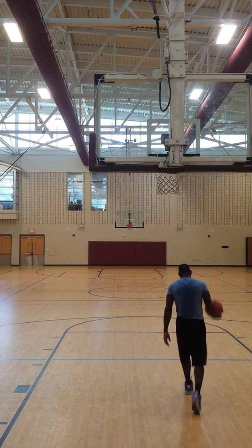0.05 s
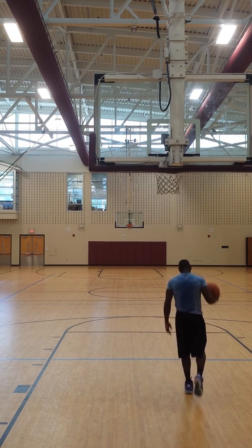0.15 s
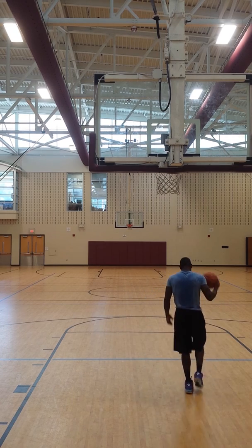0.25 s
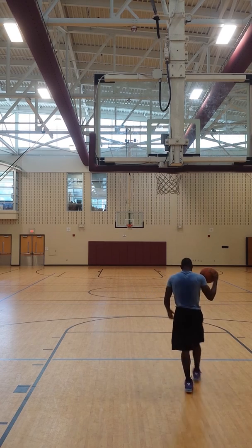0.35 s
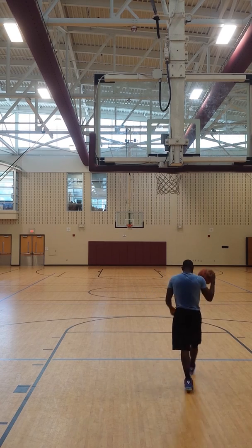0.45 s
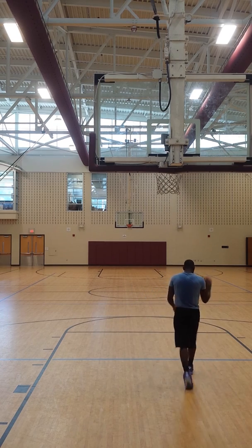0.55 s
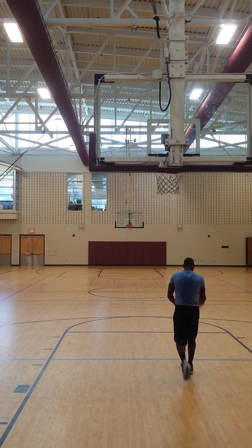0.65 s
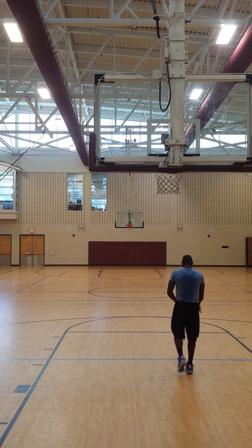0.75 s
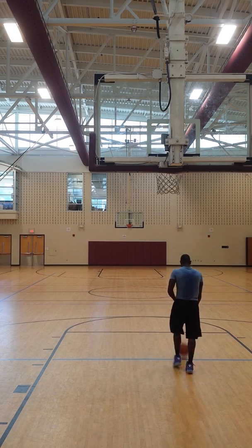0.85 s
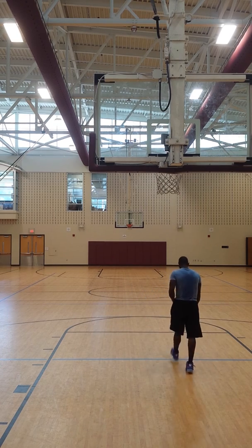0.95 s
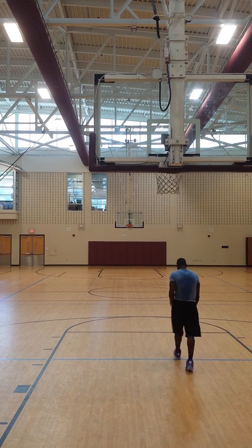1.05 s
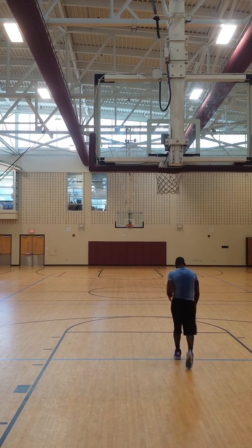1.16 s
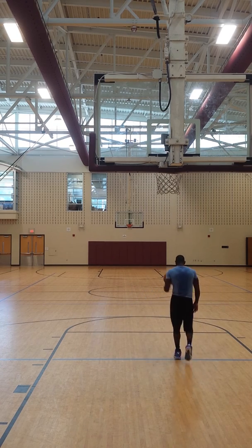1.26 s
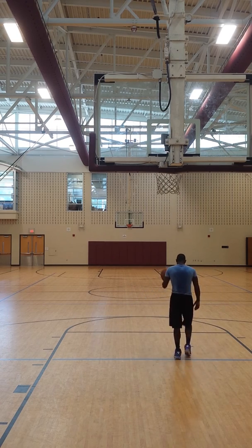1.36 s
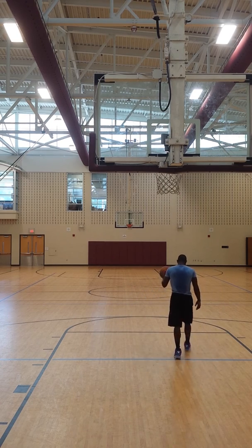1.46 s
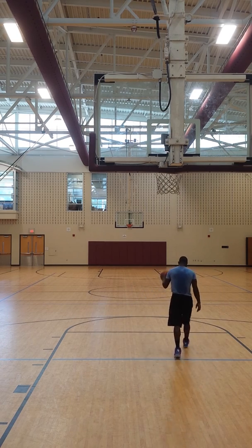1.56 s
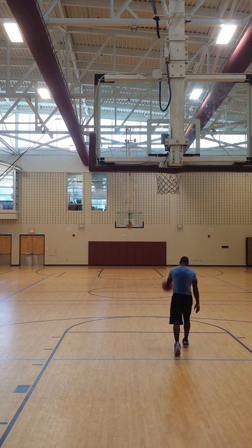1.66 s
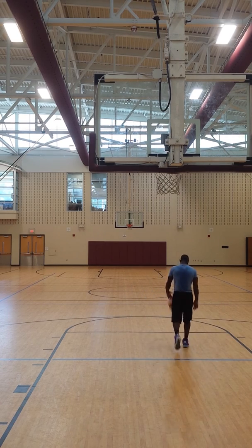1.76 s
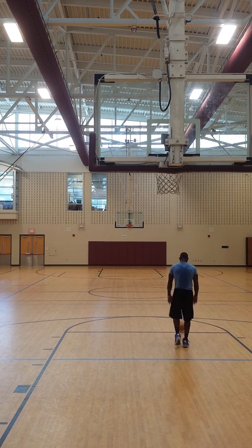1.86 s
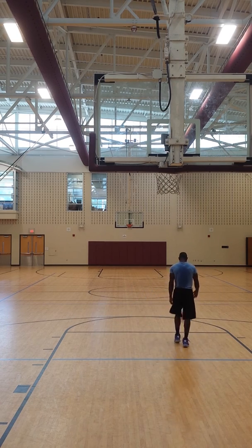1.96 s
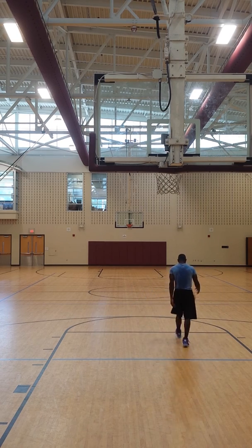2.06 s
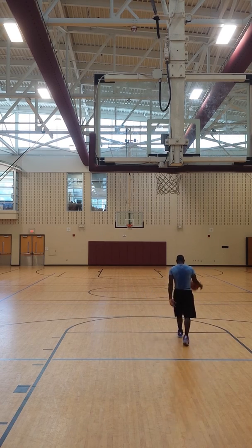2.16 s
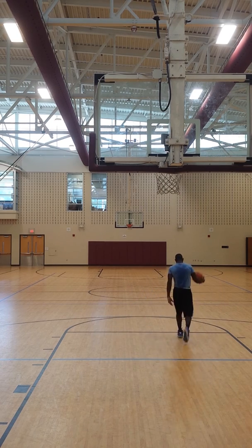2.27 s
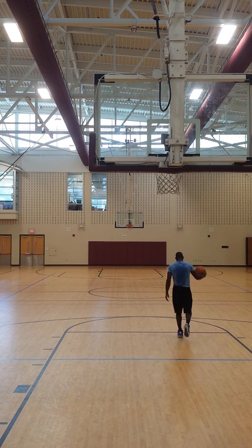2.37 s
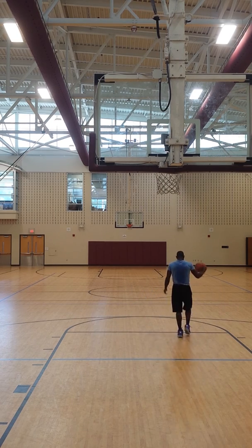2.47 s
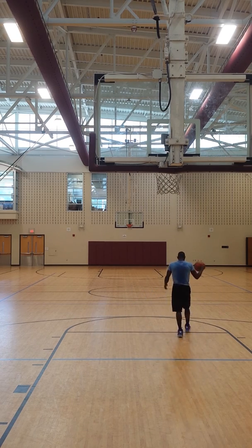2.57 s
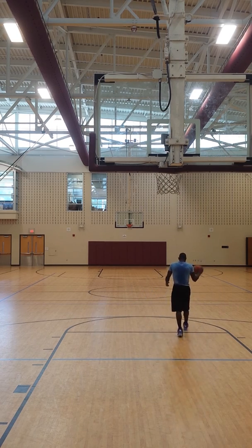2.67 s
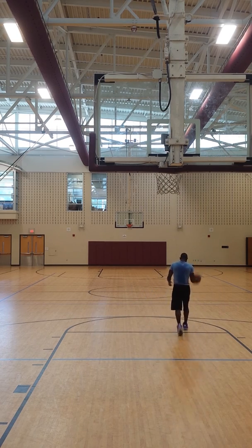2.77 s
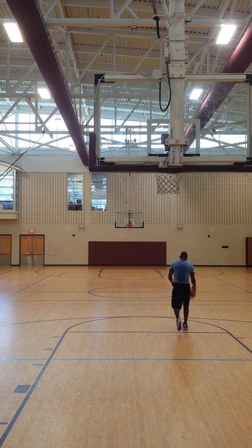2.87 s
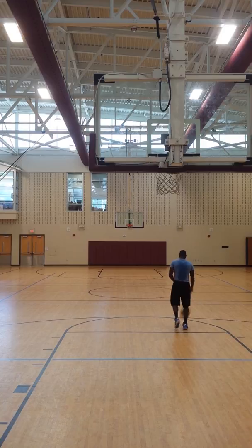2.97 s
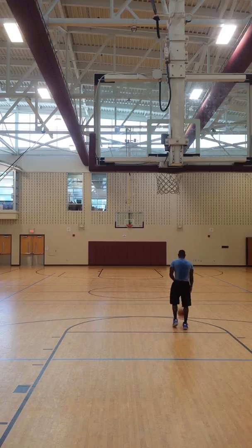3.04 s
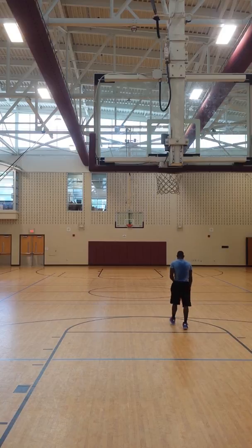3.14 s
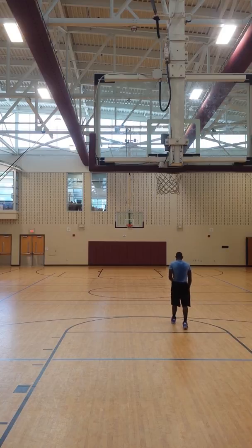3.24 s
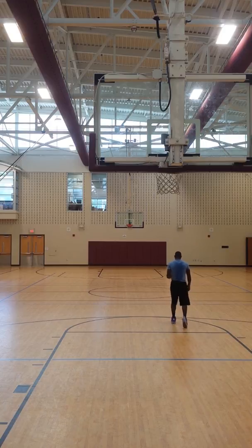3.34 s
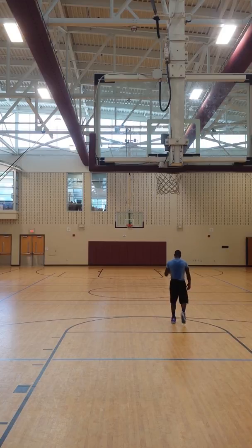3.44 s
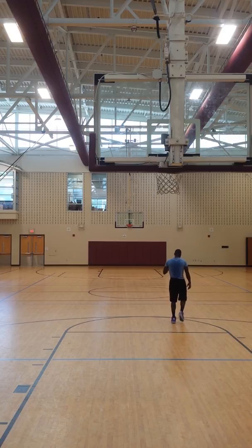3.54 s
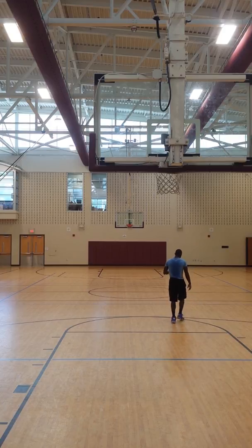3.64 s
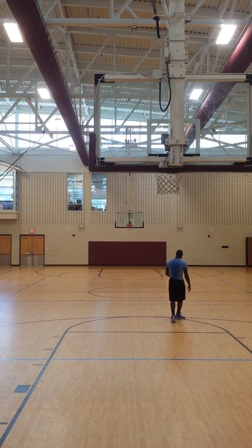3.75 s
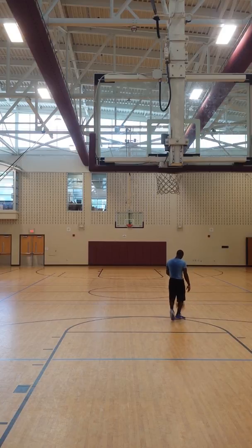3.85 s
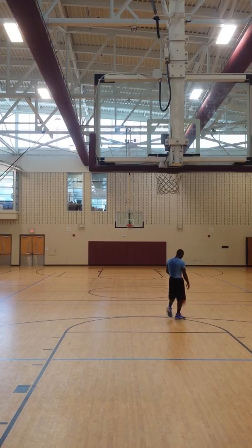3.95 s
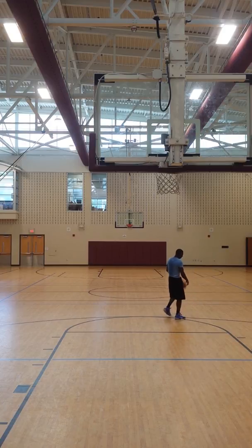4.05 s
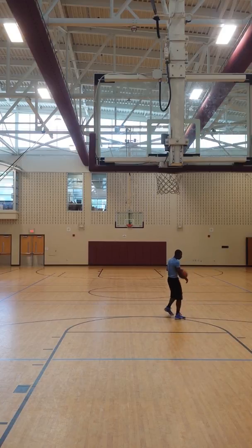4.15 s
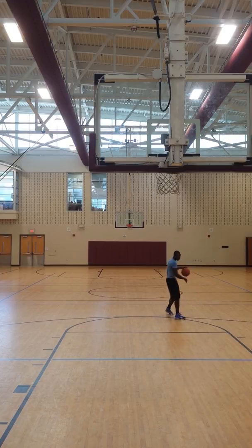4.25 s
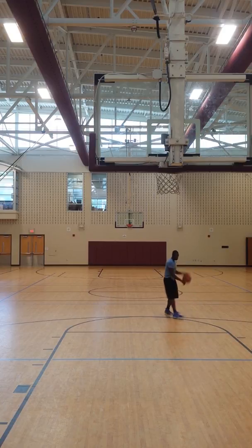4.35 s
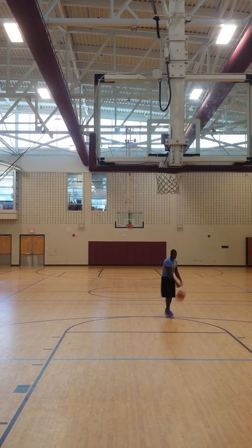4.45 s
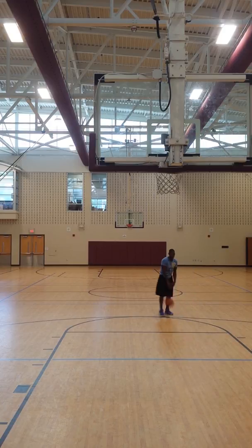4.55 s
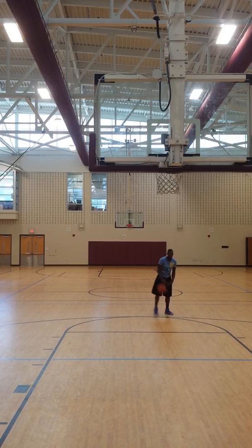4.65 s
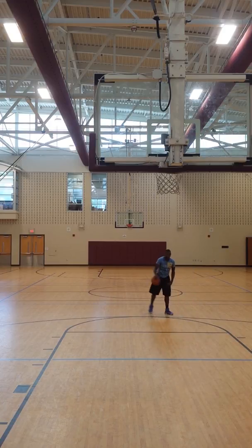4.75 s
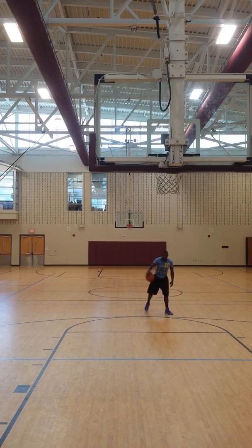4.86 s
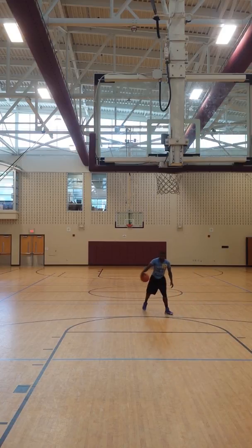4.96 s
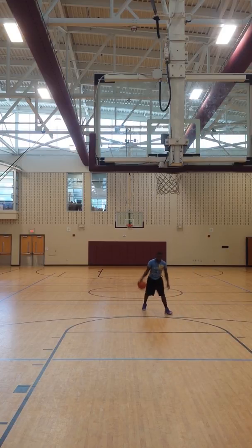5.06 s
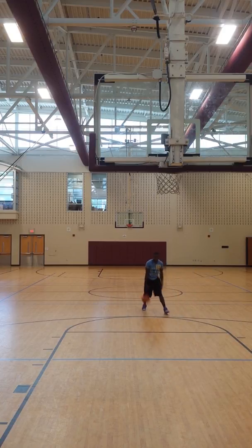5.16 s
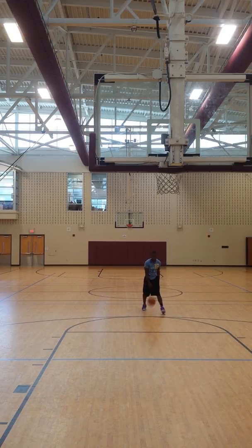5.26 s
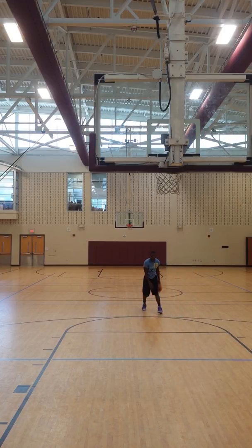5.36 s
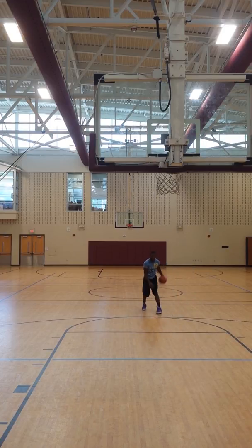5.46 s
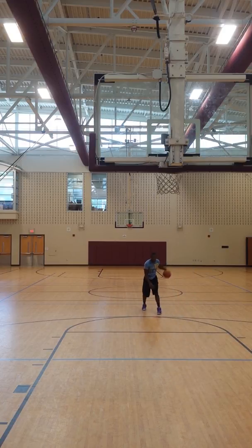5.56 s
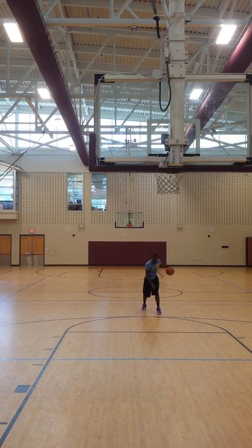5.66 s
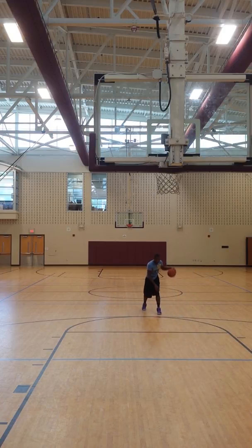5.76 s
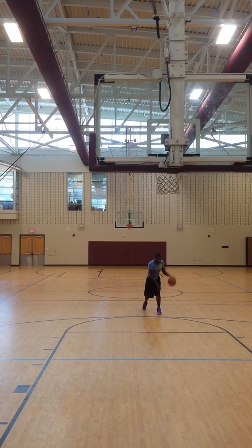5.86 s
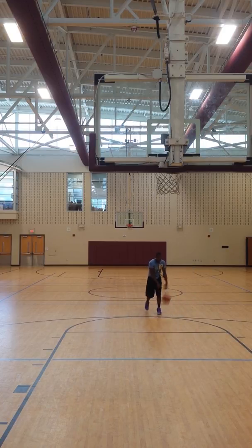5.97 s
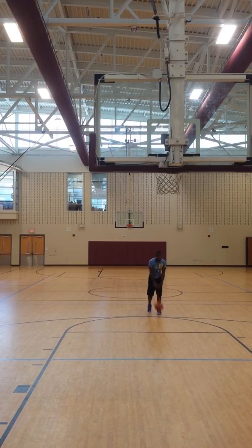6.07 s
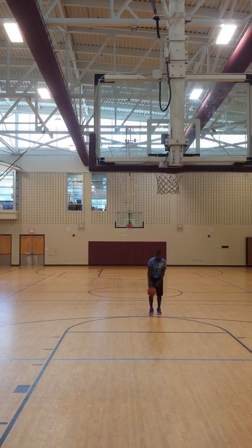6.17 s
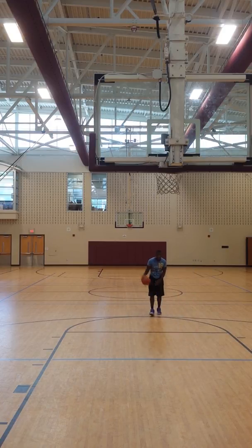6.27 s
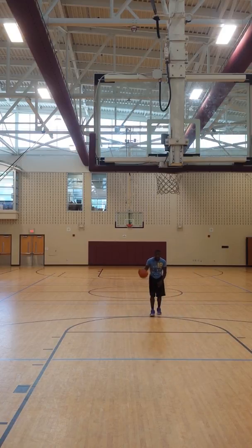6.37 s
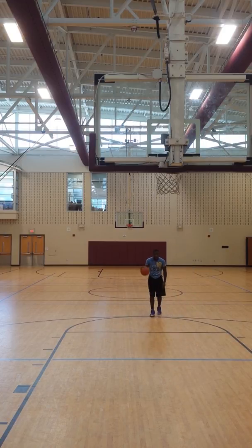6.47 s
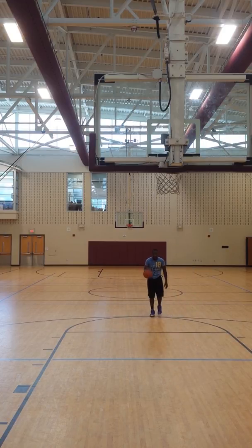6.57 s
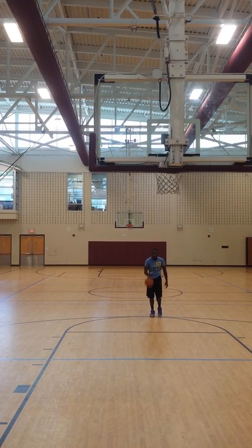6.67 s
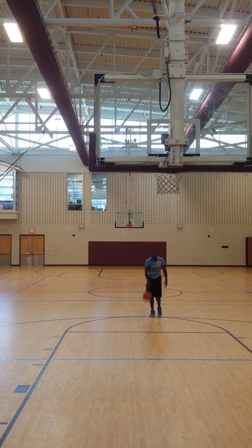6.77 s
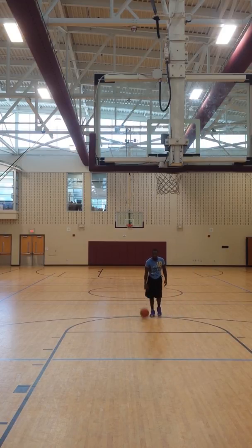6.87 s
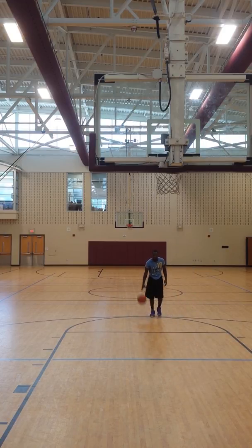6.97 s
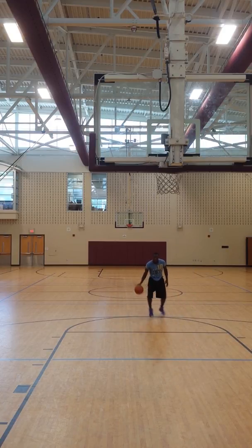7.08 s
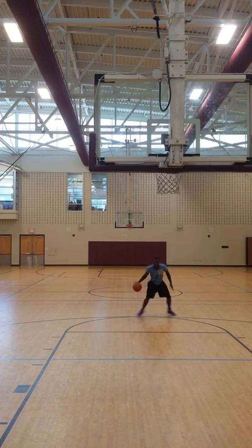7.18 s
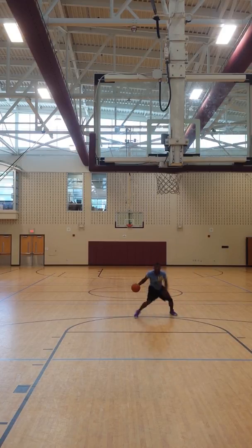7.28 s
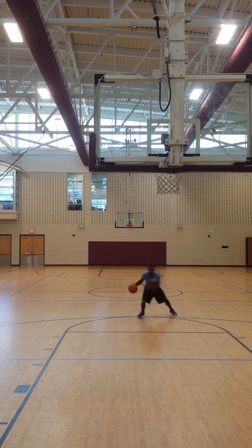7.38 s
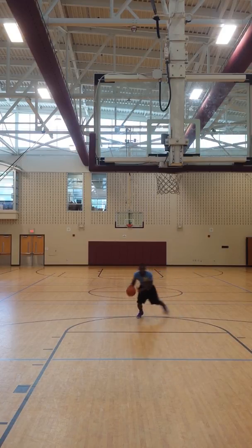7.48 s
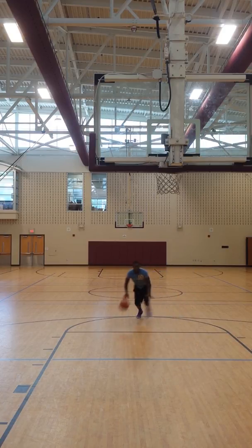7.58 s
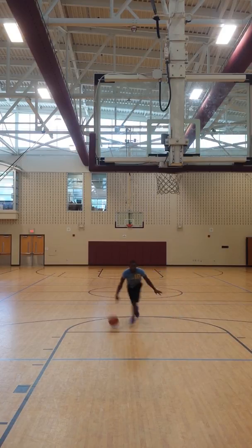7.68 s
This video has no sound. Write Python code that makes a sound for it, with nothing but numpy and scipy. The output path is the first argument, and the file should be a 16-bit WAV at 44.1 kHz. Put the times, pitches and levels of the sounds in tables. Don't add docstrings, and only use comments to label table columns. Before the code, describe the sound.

Eight basketball bounces on a wooden floor, heard from several metres away by a phone in a vast reverberant gym. The tail of an earlier bounce already hangs in the air at the start. One early hit is duller; after the player turns to face the microphone the slaps become crisper. Separate echoes smear into overlapping wash over low air-handling noise, with tiny ticks and a brief high sole squeak before the last bounce.

```python
import sys
import numpy as np
from scipy import signal
from scipy.fft import rfft, irfft, next_fast_len
from scipy.io import wavfile
from scipy.ndimage import uniform_filter1d

SR = 44100
rng = np.random.default_rng(int(sys.argv[2]) if len(sys.argv) > 2 else 0)


def gain_from_decibels(decibels):
    exponent = np.asarray(decibels, float) / 20
    return 10 ** exponent


def dump(signal):
    limited = np.clip(np.atleast_2d(signal).T, -1, 1)
    pcm = np.round(limited * 32767).astype(np.int16)
    wavfile.write(sys.argv[1], SR, pcm)


N = 340194


def unit(x):
    return x / np.sqrt(np.mean(x ** 2) + 1e-20)


def along(points, hz):
    f, v = np.transpose(points)
    return np.interp(np.log(hz + 1), np.log(f + 1), v)


def filtered(x, response):
    m = next_fast_len(x.shape[-1] + 2048)
    return irfft(rfft(x, m) * response(np.fft.rfftfreq(m, 1 / SR)), m)[..., :x.shape[-1]]


def add(track, sound, start_s):
    k = round(start_s * SR)
    first = max(k, 0)
    part = sound[..., max(-k, 0):][..., :N - first]
    track[..., first:first + part.shape[-1]] += part


def ringing(modes, t, scatter_db):
    out = 0
    for hz, db, t60_s in modes:
        level_db = db + scatter_db * rng.standard_normal()
        out = out + gain_from_decibels(level_db - 60 * t / t60_s) * np.sin(2 * np.pi * hz * t)
    return out


def ports(x, lead_ms):
    # freq_hz, left_over_right_db
    direct_pan = [(60, -6.5), (110, 2), (200, 2), (380, 3), (700, 1.5), (1290, 7), (2380, 10.5),
                  (4400, -13.5), (8120, -12.5), (15000, 2)]
    side = np.array([[.5], [-.5]])
    delay_s = 16 / SR - side * lead_ms / 1000

    def response(hz):
        return gain_from_decibels(side * along(direct_pan, hz)) * np.exp(-2j * np.pi * hz * delay_s)
    return filtered(x, response)


def impact(thump_hz, spike_us):
    # freq_hz, level_db, t60_s
    air_modes = [(1060, -11, .014), (1310, -4, .016), (1620, 1, .013), (2120, -2, .009), (2950, -7, .009),
                 (3750, -11, .009)]
    # freq_hz, level_db, t60_s
    floor_modes = [(230, 3, .05), (270, 1, .045), (350, -4, .035), (480, -4, .05), (515, -2.5, .06)]
    t = np.arange(SR // 12) / SR
    u = t / (.75 * spike_us / 1e6)
    spike = -1.1 * u * np.exp(1 - u)
    rattle = .17 * gain_from_decibels(-60 * t / .008) * rng.standard_normal(len(t))
    ring = -.42 * ringing(air_modes, t, scatter_db=2.5)
    push = 1.7 * np.sin(2 * np.pi * thump_hz * (t - .0011)) * gain_from_decibels(-60 * t / .06)
    push = push * (1 - np.exp(-t / .003))
    boards = .8 * (1 - np.exp(-t / .0035)) * ringing(floor_modes, t, scatter_db=1.5)
    return spike, rattle, ring, push, boards


def echoes(k, bounces_s, slap_db, turned):
    places = [(5.5, .6), (7.2, .6), (7.14, .7), (8.76, 1.1), (10.67, 1.55), (11.89, 1.8), (11.5, 1.4),
              (10.92, .4), (10.8, .7), (9.72, .5)]
    images = [(0, 21.63, 0), (0, 21.63, 1), (0, 43.26, 0), (0, 43.26, 2), (44, 43.26, 0), (44, 48, 0),
              (0, 66.4, 0)]
    # slap_db, change_once_turned_db, favoured_hz, thump_db
    returns = [(-2.5, -4.5, 3300, -4), (-3.5, -7, 2800, -7), (-8, -3, 3500, -15), (-10, -6, 3600, -15),
               (-7, -9, 1700, -15), (-13, -4, 2400, -17), (-13, -2, 2600, -17)]
    # start_s, slap_db, favoured_hz
    glints = [(.9463, -21, 2800), (1.9789, -24, 1800), (5.3321, -27, 1800), (.9592, -24, 2600),
              (.997, -26, 6000), (1.1796, -23, 2700), (2.3041, -27, 2000), (4.1796, -24, 2800),
              (4.619, -29, 5000), (4.8282, -26, 2500), (5.4544, -25, 2100), (5.5358, -26, 2600),
              (6.2947, -26, 2600), (7.0913, -22, 2300), (7.0669, -24, 2600), (4.093, -22, 1500),
              (7.1051, -24, 3200), (7.1648, -26, 2400)]
    sound_m_per_s, scatter_db, glint_thump_db = 343, 1.5, -17
    far_m, slope_m = places[k]
    out = []
    for (wall_m, height_m, times), (db, turned_db, hz, low_db) in zip(images, returns):
        extra_m = np.hypot(wall_m - far_m, height_m + times * slope_m) - far_m
        level_db = slap_db + db + turned * turned_db + scatter_db * rng.standard_normal()
        out.append((bounces_s[k] + extra_m / sound_m_per_s, level_db, hz, low_db))
    for when_s, db, hz in glints:
        if np.searchsorted(bounces_s, when_s) == k + 1:
            out.append((when_s, db, hz, glint_thump_db))
    return out


def panel_return(slap, favoured_hz):
    width_hz = 1.5 * favoured_hz

    def response(hz):
        return 1j * hz * width_hz / ((1.2 * favoured_hz) ** 2 - hz ** 2 + 1j * hz * width_hz)
    return filtered(slap, response)


def dribble():
    # start_s, slap_db, boards_and_ring_db, thump_hz, spike_rise_us
    hits = [
        (-.91, -12.5, -17, 141, 55),
        (-.11, -12.5, -17, 131, 55),
        (.9369, -12, -12.5, 148, 50),
        (1.9686, -17, -14.5, 151, 115),
        (3.0847, -11.5, -14, 149, 36),
        (3.9595, -12.5, -11.5, 140, 55),
        (4.6021, -9, -12.5, 126, 28),
        (5.3217, -10, -15, 136, 27),
        (6.1264, -8.5, -13, 126, 34),
        (6.9667, -10, -16, 121, 38),
    ]
    out, rise_s = np.zeros((2, N)), .0005
    second_share, second_s = .75, .00062
    ring_over_boards_db, echo_lead_ms = 4, .02
    turn_s, turned_feed_db = 4.3, -3
    feed_db, feed_follow = np.array([10.3, 8.5, 10.5, 7.5]), np.array([.6, .6, 1.1, .7])

    s, slap_db, boards_db, thump_hz, spike_us = np.transpose(hits)
    push_db = -5.2 + .17 * (thump_hz - 140)
    ring_db = boards_db + ring_over_boards_db
    levels_db = np.array([push_db, boards_db, slap_db, ring_db]).T
    mean_db = levels_db.mean(axis=0)
    for k in range(len(s)):
        spike, rattle, ring, push, boards = impact(thump_hz[k], spike_us[k])
        second = second_share * np.roll(spike, round(second_s * SR))
        slap = spike + second + rattle + gain_from_decibels(ring_db[k] - slap_db[k]) * ring
        thump = gain_from_decibels(push_db[k]) * push + gain_from_decibels(boards_db[k] + 4) * boards
        add(out, ports(gain_from_decibels(slap_db[k]) * slap + thump, lead_ms=.06), s[k] - rise_s)

        turned = s[k] > turn_s
        gain_db = feed_db + feed_follow * (levels_db[k] - mean_db)
        gain_db = gain_db + [0, 0, turned * turned_feed_db, 0]
        feed = gain_from_decibels(gain_db) @ np.array([push, boards, 1.4 * spike, .75 * ring])
        add(out, wash(feed, fill_s=.045), s[k])

        for when_s, echo_db, echo_hz, low_db in echoes(k, s, slap_db[k], turned):
            if when_s > 0:
                echo = gain_from_decibels(echo_db + 4.5) * panel_return(slap, echo_hz) + gain_from_decibels(low_db) * thump
                add(out, ports(echo, echo_lead_ms), when_s - rise_s)
    return out


def player():
    # start_s, level_db, pitch_hz
    touches = [
        (6.5945, -36, 7500),
        (6.7745, -42, 7000),
        (6.7957, -42, 9000),
    ]
    # start_s, level_db, pitch_hz, t60_s
    slips = [
        (6.7345, -36.5, 7400, .03),
        (6.738, -40, 7700, .04),
        (6.7765, -42, 7420, .03),
    ]
    out, t, chirps = np.zeros((2, N)), np.arange(SR // 16) / SR, 0
    for s, db, hz in touches:
        tick = ringing([(hz, 0, .002)], t, scatter_db=0)
        add(out, gain_from_decibels(db) * ports(tick, lead_ms=.03), s)
    for s, db, hz, t60_s in slips:
        phase = 2 * np.pi * hz * (t - 1.5 * t ** 2)
        chirp = gain_from_decibels(db - 60 * t / t60_s) * (1 - np.exp(-t / .0008))
        chirp = chirp * (np.sin(phase) + 3 * np.sin(2 * phase))
        add(out, ports(chirp, lead_ms=.026), s)
        chirps = chirps + chirp
    add(out, gain_from_decibels(16) * wash(chirps, fill_s=.1), slips[0][0])
    return out


def wash(x, fill_s):
    # freq_hz, t60_s
    hall = [(60, 2.96), (150, 2.54), (400, 1.99), (1200, 3.35), (3000, 2.34), (6000, 1.64), (12000, 0.63)]
    # freq_hz, level_db
    walls = [(40, -24), (100, -6.5), (200, -3.5), (500, -6.5), (1000, -7), (2000, 0.5), (4000, 2),
             (6000, 0), (9000, .5), (14000, -16)]
    n = 3 * SR // 2
    sparse = np.clip(.85 * np.exp(-np.arange(n) / SR / .3), 0, 1.6)
    grain = np.exp(sparse * rng.standard_normal(n) - sparse ** 2)
    crowd = rng.standard_normal((2, n)) * grain
    hz, t, z = signal.stft(crowd, SR, nperseg=256)
    shape = gain_from_decibels(-60 * t / along(hall, hz)[:, None]) * (1 - np.exp(-(t / fill_s) ** 2))
    tail = diffuse(signal.istft(z * shape, SR, nperseg=256)[1], walls)
    return signal.oaconvolve(x[None], tail / np.sqrt(SR), axes=1)


def diffuse(pair, colour):
    # freq_hz, port_likeness
    alike = [(60, 1), (130, 0.99), (290, 0.96), (640, 0.75), (1410, 0.19), (3100, 0.067), (6820, -0.0016),
             (15000, 0.24)]
    # freq_hz, left_over_right_db
    diffuse_pan = [(60, 4), (110, 1), (200, 1.5), (380, 1.5), (700, 1.5), (1290, 5), (2380, 3.5),
                   (4400, -3), (8120, -7), (15000, -9)]
    m = next_fast_len(pair.shape[1] + 2048)
    hz = np.fft.rfftfreq(m, 1 / SR)
    turn = np.arccos(np.clip(along(alike, hz), -1, 1)) / 2
    mid, side = rfft(pair, m) * gain_from_decibels(along(colour, hz)) * [np.cos(turn), np.sin(turn)]
    pan = gain_from_decibels(np.outer([.5, -.5], along(diffuse_pan, hz)))
    return irfft([mid + side, mid - side] * pan, m)[:, :pair.shape[1]]


def ventilation():
    # freq_hz, level_db_per_hz
    air = [(12, -20), (25, -12), (40, -14), (50, -8), (95, 4), (140, -3.5), (275, -8), (354, -9.5),
           (430, -15), (1110, -16.5), (3580, -24), (6090, -36.5), (10100, -39), (14100, -60), (15700, -74)]
    z = signal.stft(rng.standard_normal((2, N)), nperseg=512)[2]
    field = uniform_filter1d(rng.standard_normal(z.shape[1:]), 6, 0)
    field = uniform_filter1d(field, 14, 1)
    pair = signal.istft(z * gain_from_decibels(1.2 * unit(field)), nperseg=512)[1][:, :N]
    return gain_from_decibels(-31) * unit(diffuse(pair, air))


def scene():
    return dribble() + player() + ventilation()


def roll_off(x):
    return signal.sosfilt(signal.butter(12, 15870, fs=SR, output="sos"), x)


def record(dry):
    # freq_hz, level_db
    phone = [(20, -12), (45, -5), (70, 1.5), (100, 1.5), (150, -1.5), (200, -.6), (260, 1.5), (400, 0),
             (7000, 0), (10000, .6), (12000, -4), (14500, -8), (15500, -25), (17000, -60)]
    x = filtered(dry, lambda hz: gain_from_decibels(along(phone, hz)))
    x = x / (1 + np.abs(x / 1.2) ** 6) ** (1 / 6)
    return roll_off(x)


dry = scene()
out = record(dry)
dump(out)
```